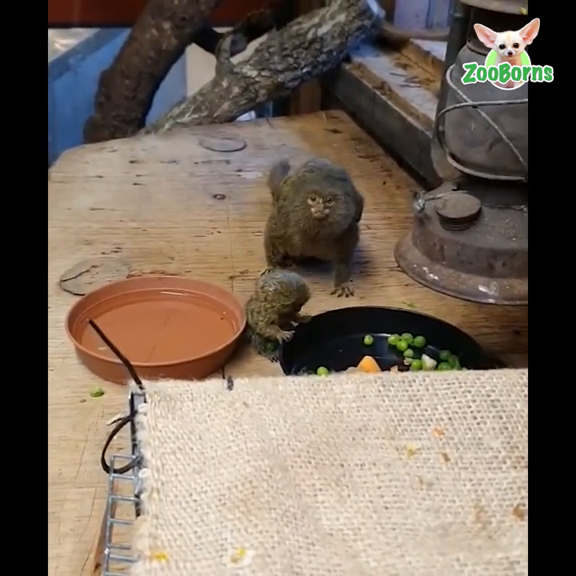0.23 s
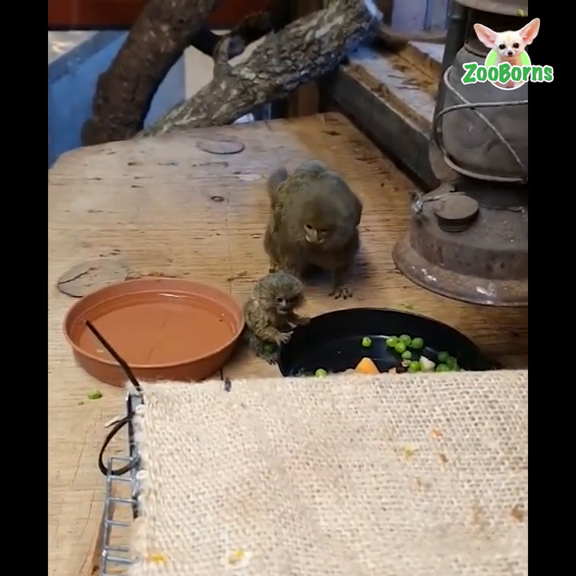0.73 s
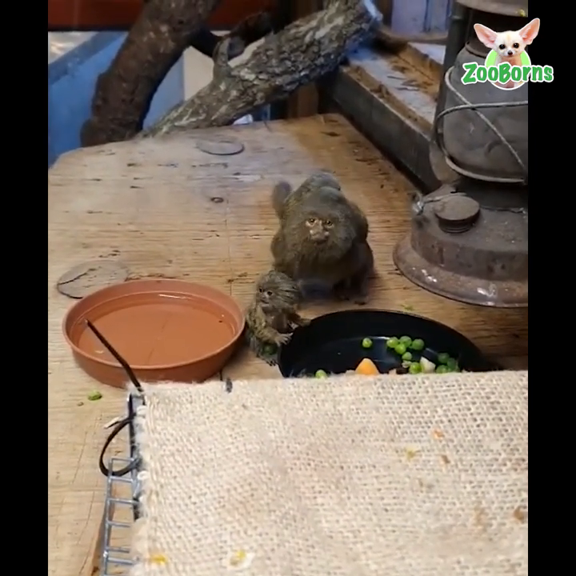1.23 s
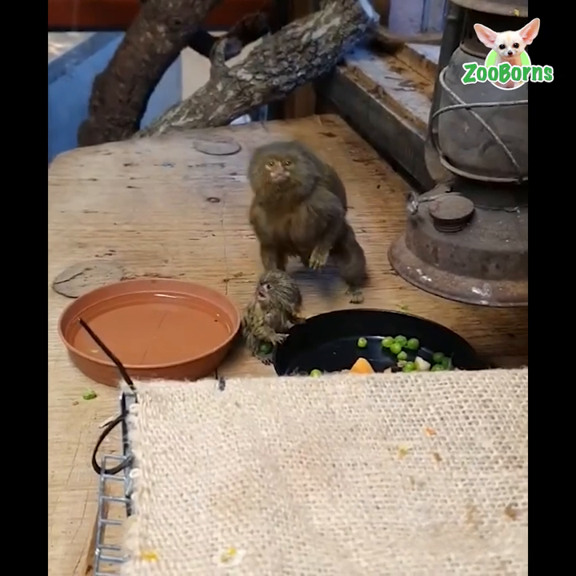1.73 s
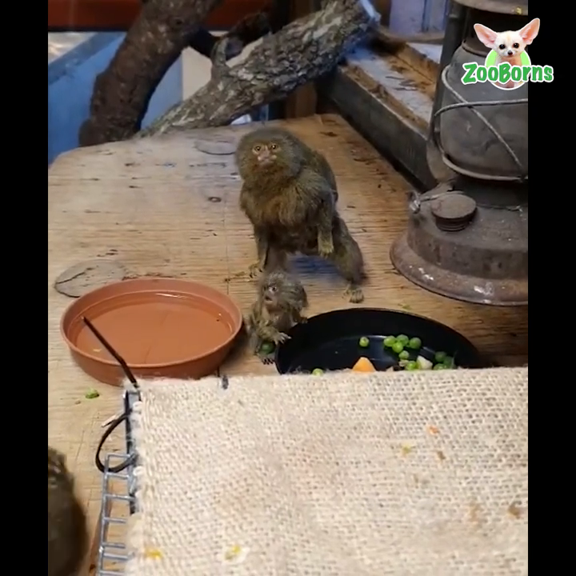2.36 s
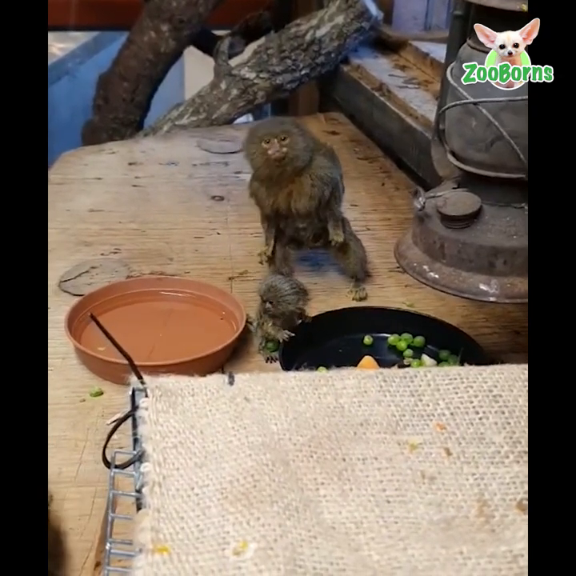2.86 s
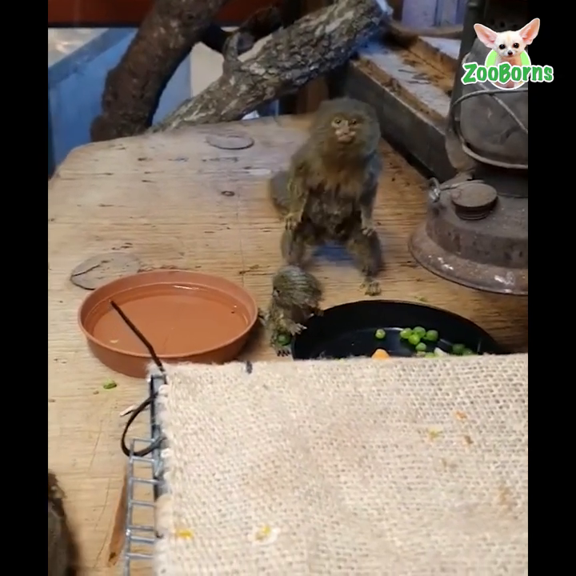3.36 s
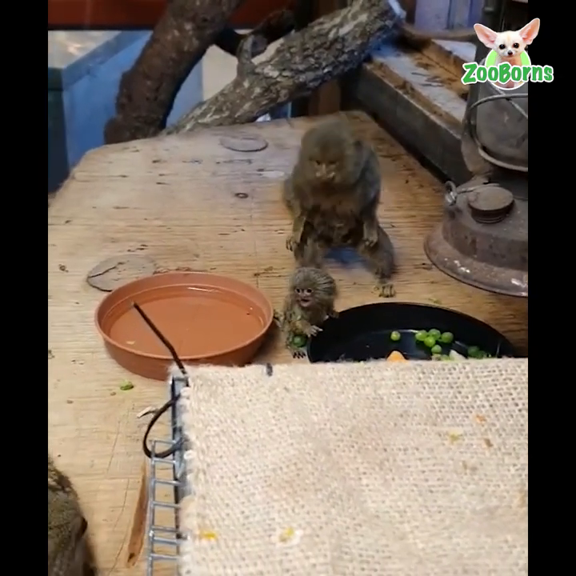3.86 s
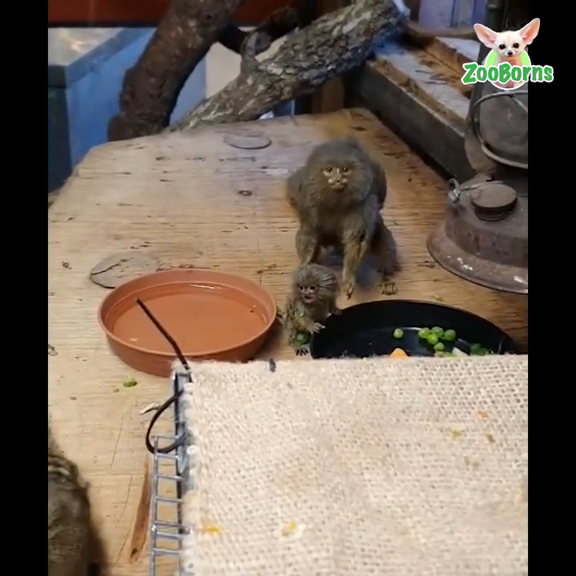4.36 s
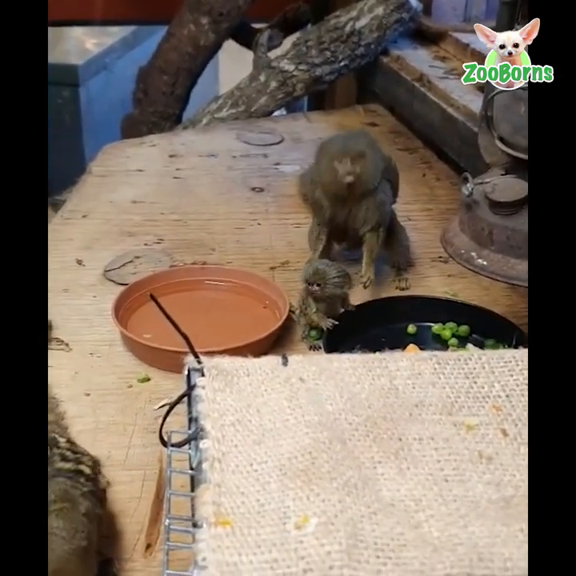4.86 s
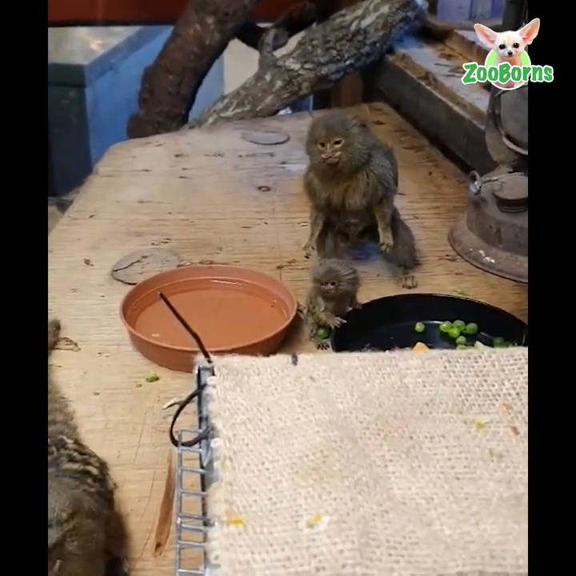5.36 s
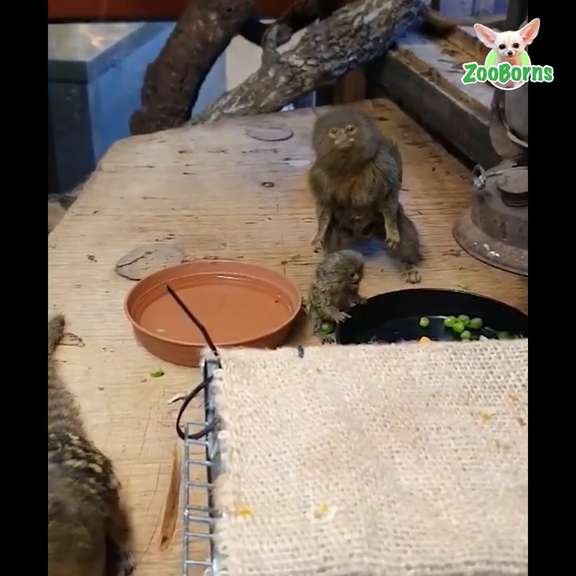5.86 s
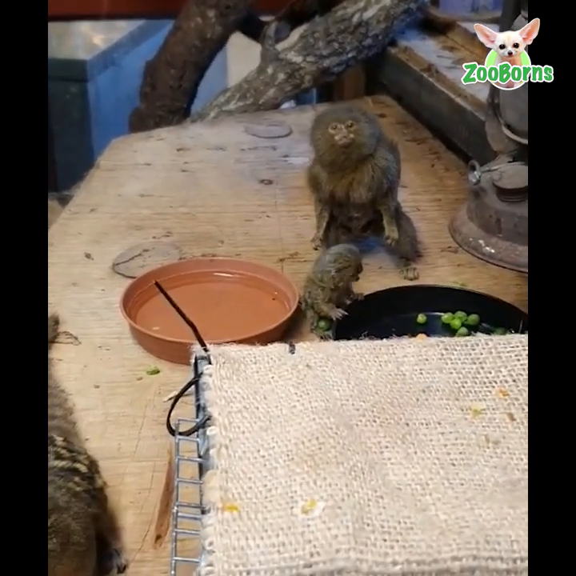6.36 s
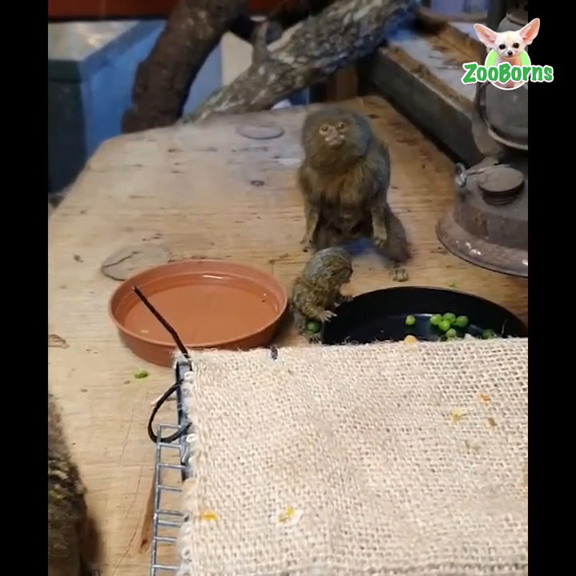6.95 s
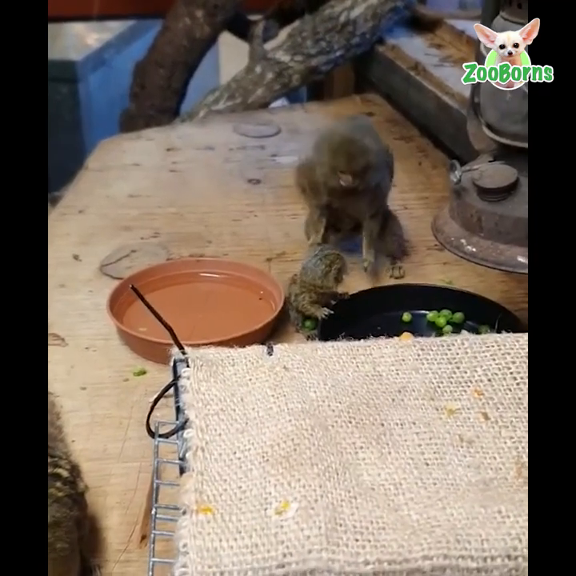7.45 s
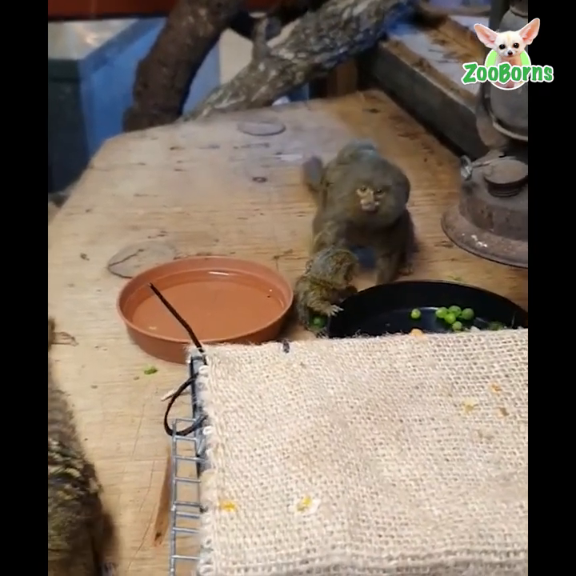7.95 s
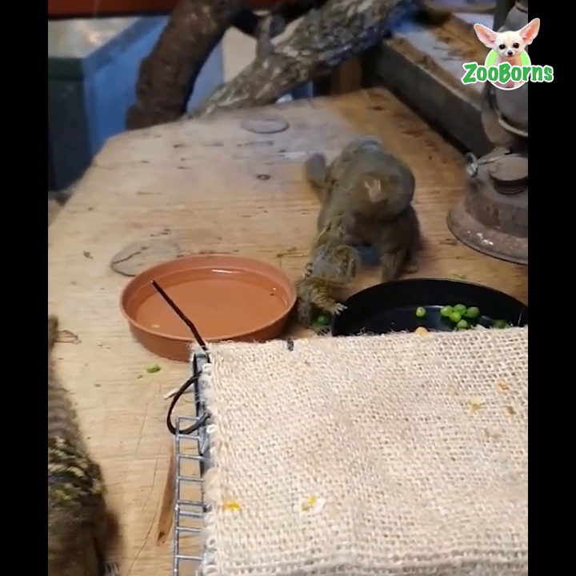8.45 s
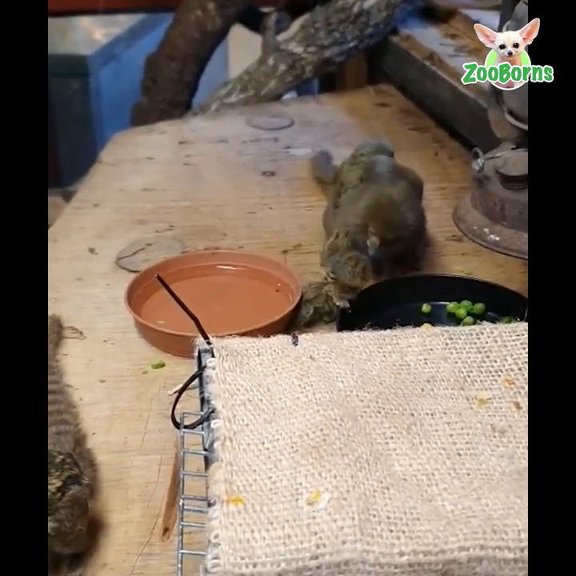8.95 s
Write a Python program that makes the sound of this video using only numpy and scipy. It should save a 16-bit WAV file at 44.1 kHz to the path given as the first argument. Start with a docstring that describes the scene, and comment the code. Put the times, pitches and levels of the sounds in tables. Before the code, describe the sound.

Tiny monkeys give extremely high rasping trills, rising twitters and sharp falling chirps in a small hard-walled enclosure, with knocks and faint low hum.

```python
"""Small, hard-walled enclosure: pygmy marmosets call on a feeding table over quiet ventilation.
Rough trills, rising twitter notes and falling chirps are swept sines with a noisy rasp, blurred by room echoes.
Knocks, bumps, thumps and rustles are shaped noise or tones; a nudged dish is a bank of ringing modes.
Nearly everything is on the left, with a trace on the right; the right has soft thumps, and both have a low hum.
"""
import sys
import numpy as np
from scipy import signal
from scipy.fft import rfft, irfft, next_fast_len
from scipy.io import wavfile
from scipy.ndimage import uniform_filter1d

SR = 44100
rng = np.random.default_rng(int(sys.argv[2]) if len(sys.argv) > 2 else 0)


def file_out(sig):
    """Save sig as 16-bit WAV at sys.argv[1]."""
    # one column per channel
    cols = np.atleast_2d(sig).T
    # limit, then scale
    lim = np.clip(cols, -1, 1)
    pcm = np.round(lim * 32767).astype(np.int16)
    wavfile.write(sys.argv[1], SR, pcm)


N = 406161
TIME = np.arange(N) / SR
RING_HZ = 9937  # pitch of most of the thin rings

# Spectrum of the ventilation and of the dull body of a rustle. Each row: frequency in Hz, level in dB.
AIR_SPECTRUM = [(88, -1.5), (150, -11.5), (272, -15), (314, -3), (627, -2), (1160, -8), (4120, -31),
                (7000, -62.5)]
# Spectrum of the thumps and the rumble. Each row: frequency in Hz, level in dB.
THUMP_SPECTRUM = [(20, -17.5), (50, 9.5), (90, 4.5), (150, -11.5), (300, -17.5), (600, -40.5)]


def from_db(db):
    """Decibels to gain."""
    return 10 ** (np.asarray(db) / 20)


def ramp(x):
    """Limit to 0..1."""
    return np.clip(x, 0, 1)


def rms_one(x):
    """Scale to unit rms."""
    return x / np.sqrt(np.mean(x ** 2) + 1e-20)


def level_curve(rows):
    """Level in dB over the whole scene, interpolated from rows of (s, dB)."""
    s, db = np.transpose(rows)
    return np.interp(TIME, s, db)


def span(start_s, end_s):
    """Sample indices between two times."""
    return np.arange(int(start_s * SR), min(int(end_s * SR), N))


def add(out, start_s, sound):
    """Mix a sound in from a start time."""
    i = max(int(start_s * SR), 0)
    out[i:i + len(sound)] += sound[:N - i]


def fade(t, edge_s):
    """Gate with soft ends over the times t."""
    to_edge_s = np.minimum(t - t[0], t[-1] - t)
    return np.sin(np.pi / 2 * ramp(to_edge_s / edge_s)) ** 2


def swells(rows):
    """Summed gain of bell-shaped swells, from rows of (centre s, half width s, dB)."""
    gain = np.zeros(N)
    for centre_s, half_width_s, db in rows:
        steepness = np.minimum(((TIME - centre_s) / half_width_s) ** 2, 100)  # avoids underflow
        gain += from_db(db) * np.exp(-steepness)
    return gain


def coloured(x, points):
    """Filter by a (Hz, dB) spectrum that falls 20 dB per octave beyond its ends."""
    hz, db = np.transpose(points)
    size = 2 * next_fast_len(N // 2 + 1)
    octave = np.log2(np.fft.rfftfreq(size, 1 / SR) + 1)
    known = np.log2(hz)
    outside = abs(octave - np.clip(octave, known[0], known[-1]))
    gain = from_db(np.interp(octave, known, db) - 20 * outside)
    return irfft(rfft(x, size) * gain, size)[:N]


def noise(points):
    """Noise of a given spectrum, rms 1."""
    return rms_one(coloured(rng.standard_normal(N), points))


def wander(corner_hz):
    """Low-passed random drift, rms 1."""
    lowpass = signal.butter(6, corner_hz, fs=SR, output="sos")
    return rms_one(signal.sosfilt(lowpass, rng.standard_normal(N)))


def whistle(hz):
    """Sine of rms 1 that follows a pitch track."""
    return np.sqrt(2) * np.sin(2 * np.pi * np.cumsum(hz) / SR)


def rasp(corner_hz):
    """Fast flutter of a harsh voice, which widens a tone to a band."""
    return rms_one(0.32 + wander(corner_hz))


def room(x, direct_db=-7, slap_db=-20, slap_s=0.018, slap_width_s=0.0023, t60_s=0.13):
    """Direct sound, a cluster of wall reflections and a dying tail, in a new pattern each time as the animals move."""
    t = TIME[:SR // 3]
    slap = from_db(slap_db) * np.exp(-((t - slap_s) / slap_width_s) ** 2)
    build_up = ramp(t / slap_s / 2 + 1 - ramp(from_db(slap_db)))  # strong slap: the tail starts weaker
    tail = from_db(-60 * t / t60_s) * build_up
    response = rng.standard_normal(len(t)) * (tail + slap)
    response /= np.linalg.norm(response)
    response[0] += from_db(direct_db)
    return signal.fftconvolve(x, response / np.linalg.norm(response))


def trills(rate_hz=37, jitter=0.62, rasp_hz=420, lurch=0.42, uneven_db=2):
    """Quick rasping sweeps that lurch in pitch and strength; the pitch drifts, then mostly drops at the end."""
    # Each row: start in seconds, length in seconds, level in dB, attack in seconds, crescendo in dB,
    # centre pitch in Hz, sag over the call in octaves, final drop in octaves, swing in octaves.
    trill_rows = [(0.699, 0.29, -26, 0.066, 1, 12380, -0.037, 0.1, 0.13),
                  (1.187, 0.26, -28, 0.028, -3.5, 12100, 0.11, 0.19, 0.14),
                  (1.676, 0.17, -28, 0.063, -7, 10820, 0.1, 0.12, 0.18),
                  (3.495, 0.24, -27.5, 0.067, 5, 12270, 0.11, -0.02, 0.12),
                  (3.899, 0.14, -32, 0.0015, 11, 9650, 0.037, -0.069, 0.072),
                  (4.366, 0.28, -32, 0.029, -5.5, 11070, -.18, 0.41, .13),
                  (5.75, 0.27, -27.5, 0.012, 5, 12230, 0.11, 0.08, .12),
                  (6.22, 0.26, -27, 0.024, -4.5, 11920, 0.084, 0.041, 0.12),
                  (7.628, 0.26, -28.5, 0.038, 3, 11960, 0.18, 0.17, 0.17),
                  (8.079, 0.26, -32.5, 0.067, -16.5, 10310, 0.2, 0.21, 0.23)]
    # Spectrum of the trills. Each row: frequency in Hz, level in dB.
    trill_spectrum = [(7500, -58), (8100, -0.5), (14300, 1.5), (15300, -11.5)]
    onset_db, release_db, release_s, drop_s = -20.5, -2.5, 0.014, 0.065

    cycles = np.cumsum(rate_hz * (1 + 0.32 * wander(25))) / SR
    sweep = np.sin(2 * np.pi * cycles) + jitter * wander(190) + lurch * wander(35)
    stray = 2 * np.tanh(sweep / 2)
    voice = rasp(rasp_hz) * from_db(uneven_db * np.tanh(wander(50)))
    out = np.zeros(N)
    for start_s, length_s, db, attack_s, crescendo_db, hz, sag, drop, swing in trill_rows:
        i = span(start_s, start_s + length_s)
        t = TIME[i] - start_s
        along, left_s = t / length_s - 0.5, length_s - t
        level_db = db + crescendo_db * along
        level_db += onset_db * ramp(1 - t / attack_s) + release_db * ramp(1 - left_s / release_s)
        octaves = swing * (stray[i] - stray[i].mean()) - sag * along - drop * ramp(1 - left_s / drop_s)
        tone = whistle(hz * 2 ** octaves) * rms_one(voice[i])
        add(out, start_s, room(from_db(level_db) * fade(t, 0.0021) * tone))
    return coloured(out, trill_spectrum)


def twitters(top_s=0.027, leap_s=0.0019, low_jitter=0.07, top_jitter=0.3, climb_octaves_per_s=4,
             rasp_hz=450, fizz_db=-21, fizz_hz=2500):
    """Each note holds a firm low pitch, then breaks into a wider, harsher top that goes on climbing."""
    # Three runs of notes. Each row: start in seconds, length of the low part in seconds, low level in dB,
    # low pitch in Hz, top level in dB, top pitch in Hz.
    twitter_rows = [(1.936, 0.019, -34.5, 9400, -40, 14320), (2.018, 0.018, -30.5, 9140, -37, 13730),
                    (2.1, 0.021, -29.5, 9600, -34.5, 13480), (2.188, 0.017, -30.5, 9770, -36, 14200),
                    (2.264, .022, -34.5, 10180, -40, 13700), (2.356, 0.012, -32, 10350, -41, 12070),
                    (4.013, 0.017, -32.5, 10200, -39, 12600), (4.134, 0.022, -35.5, 9230, -36, 12720),
                    (4.241, 0.015, -35, 10030, -43.5, 12410), (6.626, 0.039, -43.5, 10020, -34, 11600),
                    (6.759, .025, -38, 9930, -37.5, 12550), (6.878, 0.021, -32, 10040, -42, 12400),
                    (6.971, .019, -53.5, 9700, -39, 11400), (7.093, 0.022, -40.5, 10170, -37, 13300),
                    (7.204, 0.019, -37.5, 10010, -32.5, 12900), (7.311, .023, -40, 10300, -36, 11980)]
    # Range of the twittering voice. Each row: frequency in Hz, level in dB.
    twitter_spectrum = [(7700, -48), (8300, -7.5), (9200, 0.5), (15700, -2), (16400, -36)]

    out, shake = np.zeros(N), np.tanh(wander(600))
    voice = rms_one(rasp(rasp_hz) + from_db(fizz_db) * wander(fizz_hz))
    for start_s, hold_s, low_db, low_hz, top_db, top_hz in twitter_rows:
        i = span(start_s, start_s + hold_s + top_s)
        since_s = TIME[i] - start_s - hold_s
        up = 0.5 + 0.5 * np.tanh(since_s / leap_s)  # 0 in the low part, 1 in the top
        climb = climb_octaves_per_s * (since_s - top_s / 2)
        top_octaves = np.log2(top_hz / low_hz) + climb + top_jitter * shake[i]
        pitch_hz = low_hz * 2 ** (up * top_octaves + (1 - up) * low_jitter * shake[i])
        gain = from_db(low_db + up * (top_db - low_db)) * fade(TIME[i], 0.0032)
        add(out, start_s, room(gain * whistle(pitch_hz) * rms_one(voice[i])))
    return coloured(out, twitter_spectrum)


def chirps(start_hz=15390, jitter=0.17, rasp_hz=1200):
    """A harsh plunge in pitch that steadies as it lands; the walls answer with a swelling burst."""
    # Each row: start in seconds, length in seconds, level in dB, end pitch in Hz, low tail in dB,
    # hollow at 11-12.4 kHz in dB, bright top in Hz, top in dB.
    chirp_rows = [(0.527, 0.022, -24, 5010, -23.5, -5.5, 13270, 7),
                  (2.547, .016, -25, 7350, -19, -7, 15200, 7),
                  (4.988, 0.013, -18.5, 5290, -18, -8, 15400, 20),
                  (5.615, 0.017, -26.5, 6450, -24.5, -19, 14900, 6.5),
                  (7.467, 0.033, -37, 8000, -15.5, 3.5, 15500, 9),
                  (8.694, 0.022, -21, 6240, -22.5, -4, 15100, 6),
                  (8.909, 0.034, -29, 5405, -15, -4, 14230, 9)]

    out, voice, shake = np.zeros(N), rasp(rasp_hz), np.tanh(wander(700))
    for start_s, length_s, db, end_hz, tail_db, hollow_db, top_hz, top_db in chirp_rows:
        i, call = span(start_s, start_s + length_s), np.zeros(N)
        unsteady = jitter * np.linspace(1, 0, len(i)) * shake[i]
        pitch_hz = np.geomspace(start_hz, end_hz, len(i)) * 2 ** unsteady
        tone = from_db(db) * fade(TIME[i], 0.0043) * whistle(pitch_hz) * rms_one(voice[i])
        add(call, start_s, room(tone, direct_db=-14, slap_db=-5))
        out += coloured(call, [(4800, tail_db), (7300, tail_db), (8200, 2), (9500, 1), (11000, hollow_db),
                               (12400, hollow_db), (top_hz, top_db), (16000, top_db)])
    return out


def thin_ring(calls, follow_s=0.0052):
    """A pure steady pitch that swells and fades with the loudness of the calls."""
    # Each row: start in seconds, end in seconds, pitch in Hz, level against the calls in dB.
    ring_rows = [(4.017, 4.333, RING_HZ, -1), (4.362, 4.7, RING_HZ, -13), (7.206, 7.42, RING_HZ, -8.5),
                 (7.454, 7.542, 12900, -3), (7.718, 7.88, RING_HZ, -17.5)]

    loudness = np.sqrt(abs(uniform_filter1d(calls ** 2, int(follow_s * SR))))
    out = np.zeros(N)
    for start_s, end_s, hz, db in ring_rows:
        t = TIME[span(start_s, end_s)]
        add(out, start_s, from_db(db) * fade(t, 0.012) * whistle(np.full(len(t), hz)))
    return loudness * out


def squeaks(length_s=0.0233, rough=0.038):
    """A brief, faint, scratchy gliding tone with four harmonic partials."""
    # Each row: start in seconds, pitch in Hz, level in dB, step from partial to partial in dB, glide in octaves.
    squeak_rows = [(3.239, 2295, -60, -2.5, -0.17), (5.221, 1953, -65.5, 3, -0.15)]

    out, shake = np.zeros(N), wander(440)
    for start_s, hz, db, step_db, glide in squeak_rows:
        i = span(start_s, start_s + length_s)
        pitch_hz = hz * 2 ** (glide * np.linspace(-0.5, 0.5, len(i))) * (1 + rough * shake[i])
        tone = sum(from_db(db + k * step_db) * whistle((k + 1) * pitch_hz) for k in range(4))
        add(out, start_s, room(fade(TIME[i], 0.0028) * tone))
    return out


def dish(x, t60_s=0.17):
    """Ring of a feeding dish driven by x: decaying modes, scaled to unit energy."""
    # Each row: mode frequency in Hz, level in dB.
    dish_modes = [(951, -2), (1310, -8.5), (1610, -11), (1890, -5.5), (3040, -8), (4070, -11)]

    t = TIME[:SR // 2]
    modes = sum(from_db(db) * np.sin(2 * np.pi * hz * t) for hz, db in dish_modes)
    response = from_db(-60 * t / t60_s) * modes
    return signal.fftconvolve(x, response / np.linalg.norm(response))[:N]


def knocks(t60_s=0.29, tick_t60_s=0.23, rise_s=0.012, tick_rise_s=0.0015, level_db=-9, tick_db=-14, dish_db=-14):
    """Knocks on table and dishes: a woody burst and a bright tick that dies sooner; a dish rings along."""
    # Each row: start in seconds, strength in dB, treble against mids in dB.
    knock_rows = [(0.193, -44.5, 0), (2.344, -54.5, 24), (2.355, -34, 4), (2.374, -31, -48),
                  (3.039, -48, 4), (3.242, -49, 9.5), (4.025, -44, -0.5), (4.371, -39, -7.5),
                  (7.453, -48, 3), (7.799, -50.5, -7)]
    # Spectrum of the woody burst. Each row: frequency in Hz, level in dB.
    knock_spectrum = [(88, -38.5), (200, -11.5), (394, -1), (800, -1), (1400, -7), (3560, -20.5),
                      (7000, -49.5)]
    tick_spectrum = [(2000, -1), (3400, -2), (7000, -16.5), (15000, -9)]  # (Hz, dB)

    body, tick, t = np.zeros(N), np.zeros(N), TIME[:SR // 2]
    rise, tick_rise = 1 - np.exp(-t / rise_s), 1 - np.exp(-t / tick_rise_s)
    for start_s, db, treble_db in knock_rows:
        add(body, start_s, rise * from_db(db + level_db - 60 * t / t60_s))
        add(tick, start_s, tick_rise * from_db(db + treble_db + tick_db - 60 * t / tick_t60_s))
    blows = body * noise(knock_spectrum) + tick * noise(tick_spectrum)
    return blows + from_db(dish_db) * dish(blows)


def scrape(slips_per_s=250):
    """A dish nudged along the table sticks and slips unevenly; each slip sets it ringing."""
    # The nudge: centre in seconds, half width in seconds, level in dB.
    nudge = (6.075, 0.051, -57.5)

    slips = (rng.random(N) < slips_per_s / SR) * rng.choice([-1, 1], N)
    return dish(swells([nudge]) * rms_one(slips))


def rustles(grain_db=0.5, grain_hz=60):
    """The animals shift about: grainy swells of noise, each with a dull body and some treble."""
    # Each row: centre in seconds, half width in seconds, level in dB, treble against body in dB.
    rustle_rows = [(0.969, 0.086, -67.5, -13.5), (3.359, 0.069, -62.5, -8), (3.669, 0.14, -58.5, -35),
                   (4.2, 0.36, -61.5, -20.5), (4.491, 0.16, -56.5, -11), (6.081, 0.062, -62.5, 0),
                   (8.56, 0.069, -85.5, 12)]
    # Treble of a rustle. Each row: frequency in Hz, level in dB.
    treble_spectrum = [(1000, 5.5), (2100, 2.5), (3400, 6.5), (5600, -6), (7200, -34)]

    body = swells((s, width_s, db) for s, width_s, db, _ in rustle_rows)
    treble = swells((s, width_s, db + treble_db) for s, width_s, db, treble_db in rustle_rows)
    grain = from_db(grain_db * wander(grain_hz))
    return grain * (body * noise(AIR_SPECTRUM) + treble * noise(treble_spectrum))


def bumps(blur_s=0.056):
    """Dull bumps and a hoot: steady low tones in a hollow rush that is stronger the briefer they are."""
    # Each row: start in seconds, length in seconds, pitch in Hz, level in dB.
    bump_rows = [(1.516, 0.073, 397.5, -53.5), (1.581, .052, 378, -60.5), (2.009, 0.075, 318, -58.5),
                 (2.071, 0.094, 313, -56), (6.612, 0.25, 438, -57.5)]

    out, rush = np.zeros(N), noise([(200, -12.5), (300, -2.5), (500, 1.0), (650, -36)])
    for start_s, length_s, hz, db in bump_rows:
        i = span(start_s, start_s + length_s)
        blurred = whistle(np.full(len(i), hz)) + blur_s / length_s * rush[i]
        add(out, start_s, from_db(db) * fade(TIME[i], length_s / 2) * blurred)
    return out


def thumps(t60_s=0.26, rise_s=0.0023, level_db=1):
    """Soft, short swells of deep noise."""
    # Each row: start in seconds, strength in dB.
    thump_rows = [(0.992, -49), (2.842, -49), (3.436, -51), (4.271, -45.5), (4.552, -42), (6.545, -49.5),
                  (7.326, -43), (7.796, -49), (7.954, -41)]

    swell, t = np.zeros(N), TIME[:SR // 2]
    for start_s, db in thump_rows:
        add(swell, start_s, from_db(db + level_db - 60 * t / t60_s) * (1 - np.exp(-t / rise_s)))
    return swell * noise(THUMP_SPECTRUM)


def rumble():
    """Deep noise that stops short."""
    # Each row: time in seconds, level in dB.
    rumble_levels = [(0, -46), (0.53, -47.5), (0.545, -110)]
    return from_db(level_curve(rumble_levels)) * noise(THUMP_SPECTRUM)


def ventilation(waver_db=2.0):
    """A soft, slightly uneven rush of noise."""
    # Each row: time in seconds, level in dB.
    air_levels = [(0, -69), (5, -66.5), (7.8, -70), (8.2, -74), (9.2, -72)]
    return from_db(level_curve(air_levels) + waver_db * wander(10.0)) * noise(AIR_SPECTRUM)


def hiss(level_db=-83.0):
    """Steady noise in the treble."""
    # Each row: frequency in Hz, level in dB.
    hiss_spectrum = [(2000, -7), (3600, 13.5), (5200, 8), (7200, -23), (8500, 9.5), (15000, -14)]
    return from_db(level_db) * noise(hiss_spectrum)


def mains_like_hum(pitch_hz=50.4, level_db=-77):
    """A low sine with a slightly unsteady pitch."""
    return from_db(level_db) * whistle(pitch_hz * (1 + 0.004 * wander(9)))


def bass(level_db):
    """Steady noise, strongest in the bass."""
    # Each row: frequency in Hz, level in dB.
    bass_spectrum = [(20, -19.5), (55, 10), (110, -8.5), (600, -19), (6000, -29.5)]
    return from_db(level_db) * noise(bass_spectrum)


def scene():
    """Calls and room sounds on the left, a trace of them on the right, hum and bass noise on both."""
    calls = trills() + twitters() + chirps()
    voices = calls + bumps() + squeaks()
    near = knocks() + scrape() + rustles() + ventilation() + hiss()
    hum = mains_like_hum()
    trace = room(from_db(-36.5) * voices + from_db(-27.5) * near)[:N]
    # the gain of 2 raises all table levels but those of thumps and rumble by 6 dB
    left = 2 * (voices + thin_ring(calls) + near) + rumble() + hum + bass(-75.0)
    right = 2 * trace + thumps() + hum + bass(-72.5)
    return np.array([left, right])


def record(dry):
    """Steep elliptic low-pass cuts the top."""
    lowpass = signal.ellip(10, 0.3, 80, 16600, fs=SR, output="sos")  # ripple dB, stop dB, edge Hz
    return signal.sosfilt(lowpass, dry)


dry = scene()
out = record(dry)
file_out(out)
```